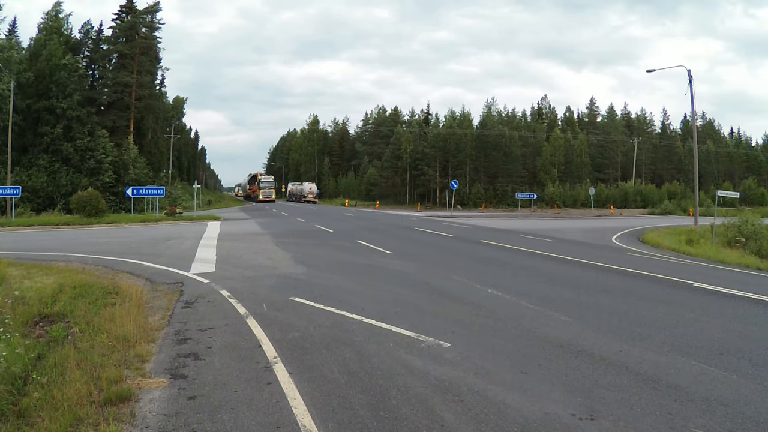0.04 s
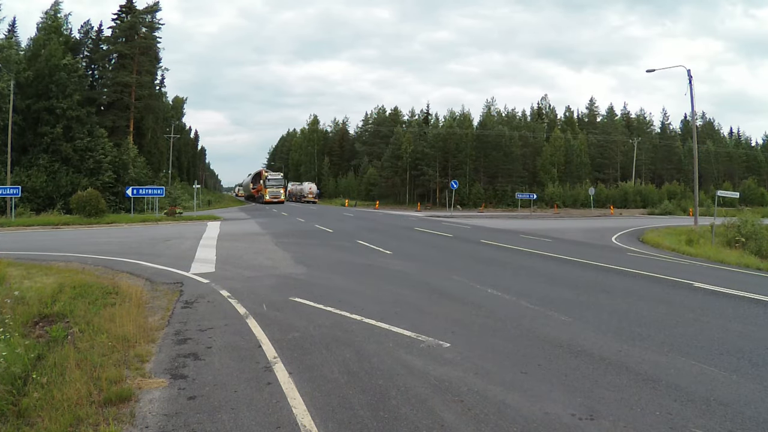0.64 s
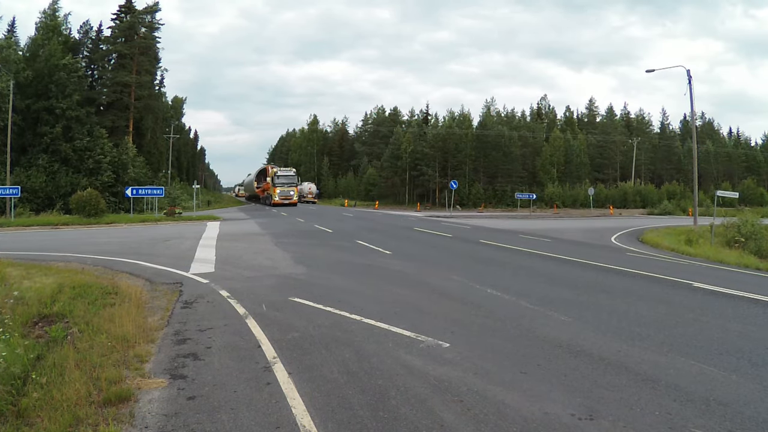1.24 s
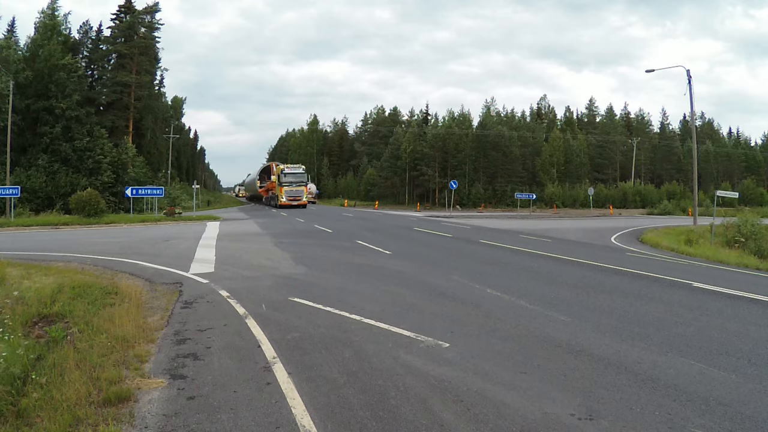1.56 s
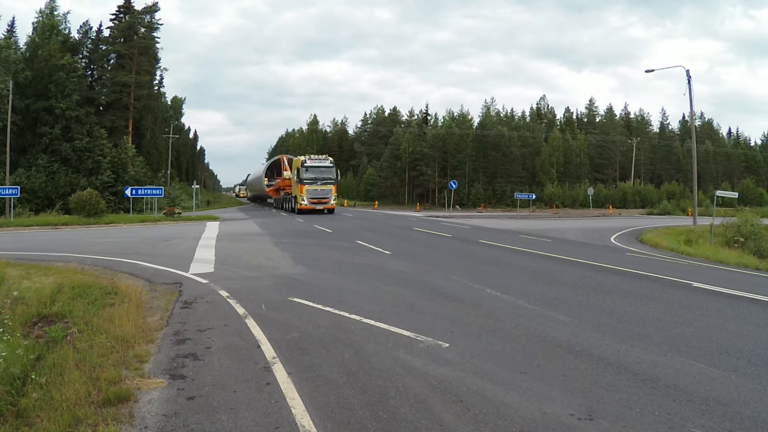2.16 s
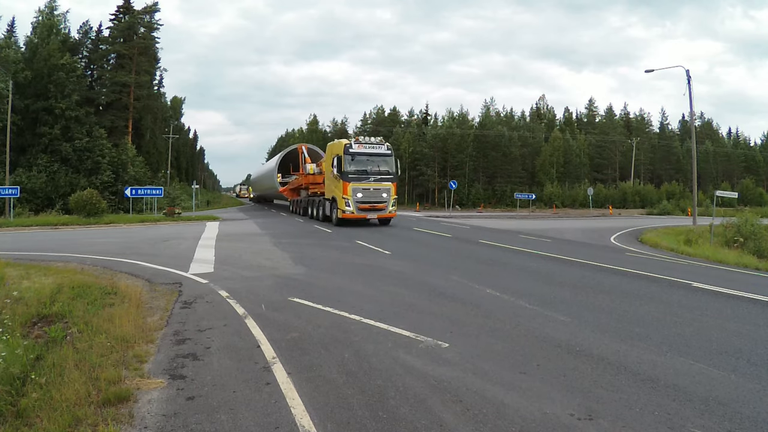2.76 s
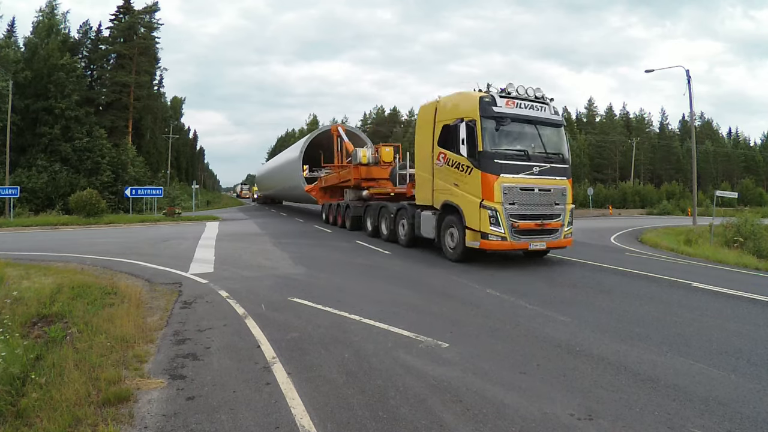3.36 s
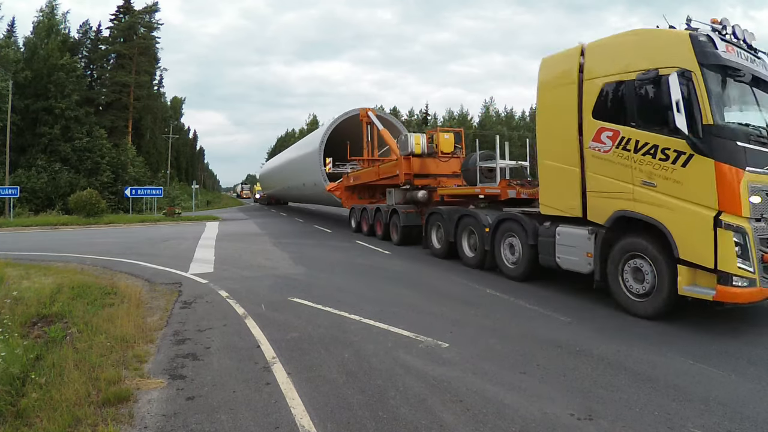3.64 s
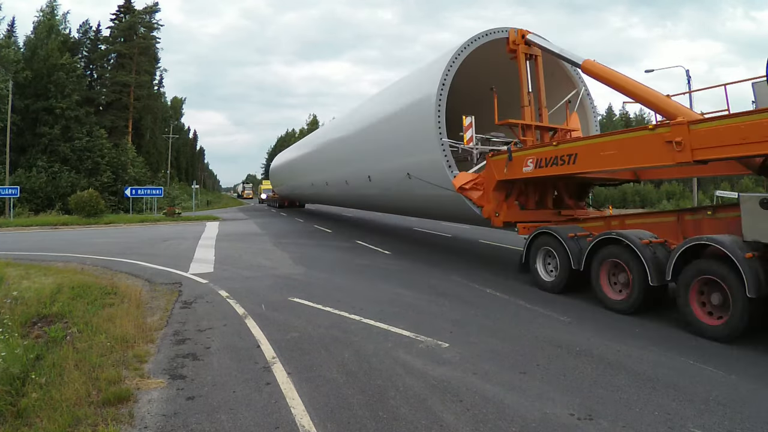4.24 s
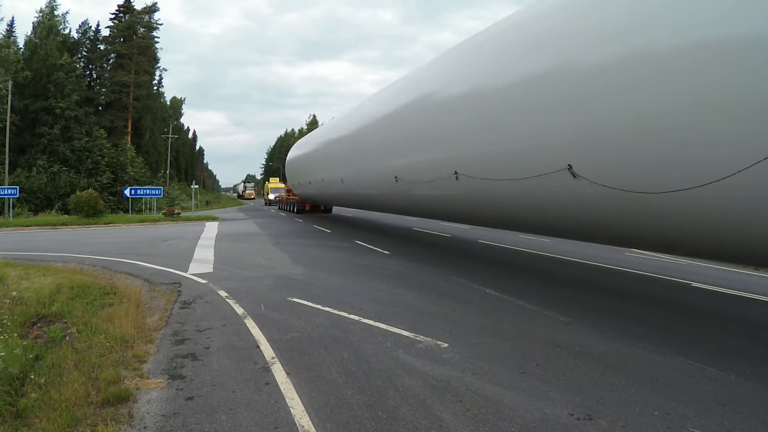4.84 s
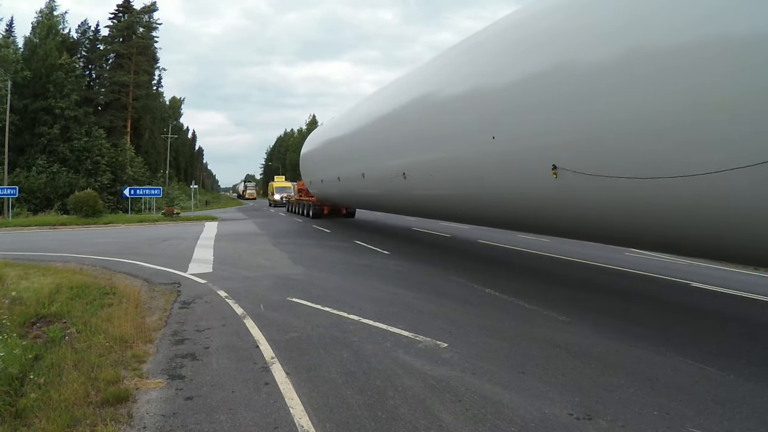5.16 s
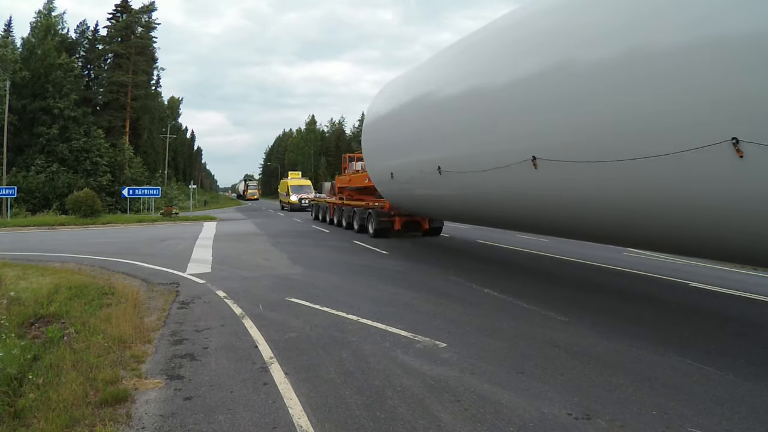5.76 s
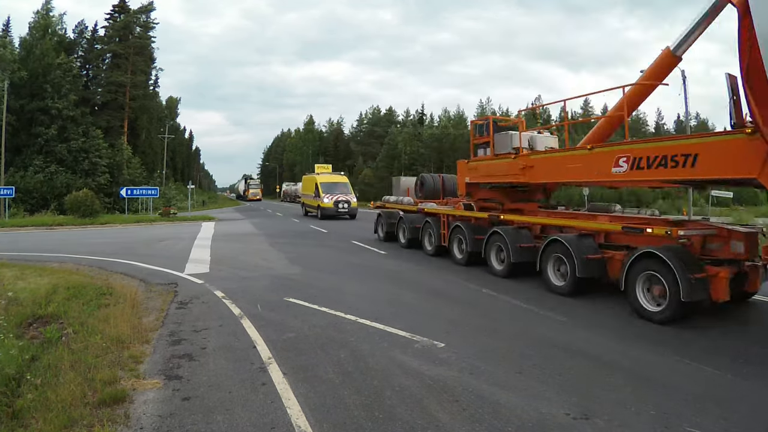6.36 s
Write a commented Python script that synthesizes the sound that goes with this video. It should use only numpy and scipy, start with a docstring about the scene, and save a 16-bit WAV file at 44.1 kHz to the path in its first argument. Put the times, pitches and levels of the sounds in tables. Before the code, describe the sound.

Two quick air horn blasts from an oncoming long truck, then its engine and tyres pass close by in gusty wind.

```python
"""From the verge of a country road, on a stereo microphone that the wind buffets throughout.
An escort car fades away while a long heavy truck comes down the road, tyres roaring, turbo hissing.
Nearly on us it gives a double toot on its air horn, and the tree line throws back a dull echo.
The cab passes close, its exhaust drone sinking in pitch; then the tread of the front bogie
howls by, and the rear bogie rolls up last."""
import sys
import numpy as np
from scipy import signal
from scipy.fft import rfft, irfft
from scipy.io import wavfile
from scipy.ndimage import uniform_filter1d

SR = 44100
rng = np.random.default_rng(int(sys.argv[2]) if len(sys.argv) > 2 else 0)


def pcm_store(signal):
    """Save signal as 16-bit PCM."""
    levels = np.round(np.clip(np.atleast_2d(signal), -1, 1) * 32767)
    wavfile.write(sys.argv[1], SR, levels.astype(np.int16).T)


N = 282240
TIME = np.arange(N) / SR
FRAME_S, BIN_HZ = np.arange(N // 256 + 5) * 256 / SR, np.fft.rfftfreq(1024, 1 / SR)
TOP_HZ = 15750
DOPPLER = 0.058  # the truck's speed over that of sound

# Escort car, tractor, front bogie, rear bogie. Each row: time when closest in seconds, relative roar
# in dB, half-width in seconds, hiss weighting in dB, share of NEAR_TYRES when closest, of REAR_TYRES.
WHEEL_PASSES = [(.05, -41, 2.2, -16, 0.67, 0.47), (4.05, -30, 0.84, -13.5, 0.55, 0.23),
                (4.72, -32.5, 0.29, -13, .97, 0.33), (6.7, -32.7, 0.85, -16, 0, 0.8)]
# Tread roar from afar, up close and at the rear. Each row: frequency in Hz, relative density in dB.
FAR_TYRES = [(150, -40), (280, -9.5), (480, -2), (780, 2.5), (1050, -6), (1400, -10), (2000, -12),
             (3000, -23), (6000, -35), (9500, -41), (15500, -59)]
NEAR_TYRES = [(150, -31), (280, -9.5), (450, -5.5), (690, -2.5), (1150, -11), (2050, -16), (3000, -23),
              (6500, -30.5), (9500, -41.5), (15500, -41)]
REAR_TYRES = [(150, -33), (280, -7), (560, -6), (880, 0), (1500, -6.5), (3000, -20.5), (6000, -32),
              (9300, -31.5), (12000, -42), (15500, -56)]
# Road noise at the microphone's two ports. Each row: frequency in Hz, left-right likeness from 0 to 1.
PORT_LIKENESS = [(100, 0.87), (400, 0.62), (3000, 0.78), (14000, 0.42)]
# The side the traffic is on. Each row: time in seconds, left minus right in dB.
BEARING = [(0.05, -8.5), (0.94, -3.5), (1.23, 2), (2.64, 2), (3.31, 0), (3.55, -3.5), (3.69, -2.5),
           (4.63, -9.5), (4.94, -8.5), (5.17, -7), (5.2, -7), (5.81, 1.0), (6.3, -1.0)]
# A source far to the right. Each row: frequency in Hz, phase lead of the left port in radians.
PORT_PHASE = [(60, -0.5), (200, -1.5), (700, -3), (1800, -5), (9000, -5)]
# Engine and chassis rumble, and turbocharger air. Each row: frequency in Hz, relative level in dB.
RUMBLE_COLOUR = [(30, -29), (100, -8), (138, -2.5), (175, -6.5), (220, -4.5), (300, -18), (900, -56)]
TURBO_COLOUR = [(3000, -72), (8500, -1), (10300, 3.5), (11100, -5), (15500, -10)]
# Wind on the microphone. Each row: start in seconds, length in seconds, strength in dB.
GUSTS = [(0.993, 0.083, -40), (1.76, 0.16, -40.5), (2.093, 0.57, -39.5), (3.85, 0.46, -37),
         (4.4, 0.72, -38), (5.16, 0.16, -32.5), (5.353, 1.02, -33.5)]
# Slow buffeting and faster eddies. Each row: frequency in Hz, relative density in dB.
WIND_COLOUR = [(5, 3), (14, 4), (40, 2.5), (75, -6.5), (180, -28.5), (450, -106)]
FLUTTER_COLOUR = [(30, -18), (65, 2), (115, -1.5), (200, -15), (450, -55)]
# Brief dips in the traffic's level. Each row: start in seconds, nominal depth in dB.
DIPS = [(1.01, 8), (1.762, 7), (2.12, 4.5), (2.8, 3)]
# Stones flicked by the tyres. Each row: start in seconds, relative level in dB, ring in Hz.
STONES = [(2.0208, -51, 6140), (3.1368, -35, 7560), (6.048, -42, 4860)]
# Pulls on the horn valve. Each row: time of full pressure, hold, rise and release in seconds,
# pressure in dB, second pipe mode relative to the first in dB.
TOOTS = [(3.26, 0.12, .013, 0.097, 0, -11), (3.533, 0.0034, 0.046, 0.053, -0.79, -1.5)]
# The horn's overtones at full blast. Each row: frequency in Hz, relative level in dB.
HORN_BELL = [(800, 2), (1080, 2.8), (1350, 1), (1900, 3), (2450, -1), (3000, -3.5), (4200, -10.5),
             (6200, -20.5), (8500, -15), (11000, -21.5), (15500, -29)]
# Wave steepening in the horn. Each row: frequency in Hz, dB an overtone gains for each dB of blare.
STEEPENING = [(800, 0.19), (1600, 0.92), (3200, 1), (4500, 2), (9000, 3)]
# Howling tread. Each row: time when closest in seconds, level in dB, half-width in seconds, pitch in Hz.
BOGIE_HOWLS = [(4.5, -32, 0.22, 680), (6.5, -34.5, 0.2, 850)]


def amp(db):
    return 10 ** (np.asarray(db) / 20)


def unit_rms(x):
    return x / np.sqrt(np.mean(x ** 2) + 1e-20)


def spectrum_at(points, hz):
    """A spectrum table interpolated over log frequency."""
    f, value = np.transpose(points)
    return np.interp(np.log(hz + 1), np.log(f + 1), value)


def drift(rate_hz, size):
    """Random wander of rms 1, mostly below rate_hz."""
    hz = np.fft.rfftfreq(size, 1 / SR)
    return unit_rms(irfft(rfft(rng.standard_normal(size)) / (1 + (hz / rate_hz) ** 4), size))


def stereo_noise(gain, patchy_db, likeness=None):
    """Patchy noise, partly alike at the two ports, shaped by gains over frames and bins."""
    if likeness is None:
        likeness = spectrum_at(PORT_LIKENESS, BIN_HZ)
    a, b, c, d, patches = rng.standard_normal((5, len(FRAME_S), len(BIN_HZ)))
    patches = unit_rms(uniform_filter1d(uniform_filter1d(patches, size=9, axis=0), size=14, axis=1))
    left = a + 1j * b
    right = likeness * left + np.sqrt(1 - likeness ** 2) * (c + 1j * d)
    spectra = np.array([left, right]) * gain * amp(patchy_db * patches)
    return signal.istft(spectra.swapaxes(1, 2), nperseg=1024, noverlap=768)[1][:, :N]


def band_norm(gain, low_hz, high_hz):
    return np.linalg.norm(gain[:, (BIN_HZ > low_hz) & (BIN_HZ < high_hz)], axis=1, keepdims=True)


def closeness(t, closest_s, width_s):
    """Inverse squared distance of a source driving straight past the microphone, 1 when closest."""
    return 1 / (1 + ((t - closest_s) / width_s) ** 2)


def passing(t, closest_s, db, width_s):
    """Gain of a source driving by: 23 dB less for each tenfold of squared distance."""
    return amp(db + 23 * np.log10(closeness(t, closest_s, width_s)))


def tyres(trim_db=1.3, hiss_trim_db=1.15, hiss_lead_s=0.46):
    """Each group of wheels roars by in turn; the tread throws its hiss forward, duller from afar."""
    t, power = FRAME_S[:, None], 0
    treble = spectrum_at([(1200, 0.062), (3500, 0.9)], BIN_HZ)
    far_db, near_db, rear_db = (spectrum_at(c, BIN_HZ) for c in (FAR_TYRES, NEAR_TYRES, REAR_TYRES))
    for closest_s, roar_db, width_s, hiss_db, near, rear in WHEEL_PASSES:
        near = near * closeness(t, closest_s, width_s)
        gain = amp((1 - near - rear) * far_db + near * near_db + rear * rear_db)
        gain /= band_norm(gain, 450, 2200)
        plain_hiss_db = 20 * np.log10(band_norm(gain, 3000, 7000))
        dull_db = 7 * (1 - closeness(t + hiss_lead_s, closest_s, width_s))
        gain *= amp(treble * (hiss_db + hiss_trim_db - dull_db - plain_hiss_db))
        gain *= passing(t, closest_s, roar_db + trim_db, width_s)
        power = power + gain ** 2
    return stereo_noise(np.sqrt(power), patchy_db=1.33)


def approach(t, abreast_s=4.18, glide_s=0.301):
    """The cab's motion towards the microphone: 1 head-on, -1 going away."""
    return (abreast_s - t) / np.hypot(abreast_s - t, glide_s)


def engine(rest_hz=214.6, waver_db=0.5, fuzz=0.34):
    """A wavering exhaust drone that sinks with the Doppler shift, over engine and chassis rumble."""
    toward = approach(TIME)
    hz = rest_hz * (1 + DOPPLER * toward) + drift(4.0, N)
    phase = 2 * np.pi * np.cumsum(hz) / SR
    distant = amp(np.interp(toward, [-1, 1], [-55, -45.5]))  # louder coming than going
    level = np.hypot(distant, passing(TIME, closest_s=4.29, db=-31.5, width_s=0.3))
    drone = 0
    for k, harmonic_db in enumerate([1, -16, -16], 1):
        waver = amp(waver_db * drift(5, N)) + fuzz * (drift(25, N) + 1j * drift(24, N))
        drone = drone + level * amp(harmonic_db) * (waver * np.exp(1j * k * phase)).real
    rumble = np.hypot(amp(-44.5), passing(FRAME_S[:, None], closest_s=3.95, db=-35, width_s=0.73))
    colour = amp(spectrum_at(RUMBLE_COLOUR, BIN_HZ))
    return drone + stereo_noise(rumble * colour / np.linalg.norm(colour), patchy_db=-0.2)


def gusts(breeze_db=-44, rise_s=0.023, fall_s=0.058):
    """Strength of the wind: a steady breeze, and gusts that rise fast, hold and die away."""
    power = amp(breeze_db) ** 2
    for start_s, length_s, db in GUSTS:
        age = TIME - start_s
        shape = np.clip(age / rise_s, 0, 1) * np.exp(-np.maximum(age - length_s, 0) / fall_s)
        power = power + (amp(db) * shape) ** 2
    return np.sqrt(power)


def buffet(colour, lumps_db):
    """Lumpy low noise of rms 1, separate at each microphone port."""
    shape = amp(spectrum_at(colour, np.fft.rfftfreq(N, 1 / SR)))
    ports = []
    for _ in range(2):
        eddies = irfft(rfft(rng.standard_normal(N)) * shape, N)
        ports.append(unit_rms(eddies * amp(lumps_db * drift(4.0, N))))
    return np.array(ports)


def wind(buffet_db=1.0, flutter_db=-41.5, hard_gust_db=-33, left_db=3.5):
    """Wind on the microphone, harder on the left; its flutter grows with the square of its strength."""
    strength = gusts()
    slow = strength * amp(buffet_db) * buffet(WIND_COLOUR, lumps_db=0.5)
    flutter = (strength / amp(hard_gust_db)) ** 2 * amp(flutter_db) * buffet(FLUTTER_COLOUR, lumps_db=1.5)
    return (slow + flutter) * amp([[left_db], [0]])


def turbo(start_s=0.67, rise_s=2.5, closest_s=3.79, shade_db_per_s=3):
    """Turbocharger air hisses in from up the road and sinks in pitch; the cab hides it once past."""
    t = FRAME_S[:, None]
    distant = amp(-69.5) * np.clip((t - start_s) / rise_s, 0, 1)
    close = amp(-44.5) * closeness(t, closest_s, width_s=0.3) ** 0.73
    level = np.hypot(distant, close) * amp(-shade_db_per_s * np.maximum(t - closest_s, 0))
    shift = (1 + DOPPLER * approach(t)) / (1 + DOPPLER)
    colour = amp(spectrum_at(TURBO_COLOUR, BIN_HZ / shift))
    colour /= np.linalg.norm(colour, axis=1, keepdims=True)
    return stereo_noise(level * colour, patchy_db=1.5, likeness=0.84)


def dips(drop_s=0.04, recovery_db_per_s=15.5):
    """A gain that drops quickly at each dip and climbs back steadily."""
    loss_db = 0
    for start_s, depth_db in DIPS:
        age = TIME - start_s
        loss_db += np.clip(age / drop_s, 0, 1) * np.maximum(depth_db - recovery_db_per_s * age, 0)
    return amp(-loss_db)


def grit(trim_db=-4, ring_s=0.0018):
    """Small stones snap out from under the tread."""
    ticks, t = np.zeros(N), TIME[:SR // 50]
    for start_s, db, hz in STONES:
        tick = drift(1500, len(t)) * np.sin(2 * np.pi * hz * t) * np.exp(-t / ring_s)
        ticks += amp(db + trim_db) * np.interp(TIME, start_s + t, tick, left=0, right=0)
    return ticks


def horn_reed(t, gentle_hz=273.3, flat_hz=1.8, sag_hz=6.4, wobble_hz=0.51, break_s=3.329):
    """Air pressure on the reed sets pitch, pipe modes and blare; it rattles as the overblowing breaks."""
    pulls_db = []
    for full_s, hold_s, rise_s, release_s, db, _ in TOOTS:
        off_peak = np.maximum(full_s - t, 0) / rise_s + np.maximum(t - full_s - hold_s, 0) / release_s
        pulls_db.append(db - 5.5 * off_peak ** 1.88)
    pressure_db = np.max(pulls_db, axis=0)
    octaves_db = np.array(TOOTS)[:, -1:] * np.ones(len(t))
    octave_db = np.average(octaves_db, axis=0, weights=amp(pulls_db) ** 2 + 1e-20)
    # Overblown, the note settles flatter, and the second mode takes over and swells with the overtones.
    overblown = 0.5 - 0.5 * np.tanh((t - break_s) / 0.0053)
    settled = overblown * (1 - np.exp(-np.maximum(t - TOOTS[0][0], 0) / 0.022))
    swell_db = 1.5 * np.exp(-((t - 3.302) / 0.021) ** 2)
    rattle = np.exp(-((t - break_s - 0.012) / 0.02) ** 2)
    blare_db = 9 * pressure_db
    hz = gentle_hz - flat_hz * amp(blare_db) - sag_hz * settled + wobble_hz * drift(33, len(t))
    pipe_db = -14 + pressure_db - 6 * rattle
    first_db = pipe_db - 15.5 * overblown
    second_db = pipe_db + octave_db * (1 - overblown) - 2 * overblown + swell_db
    roughness = 0.1 * (1 - overblown) + 0.67 * rattle
    return hz, first_db, second_db, blare_db + swell_db, roughness


def horn(open_s=3.215, silent_s=3.72, overtones_db=-20.5, odd_db=-5, flutter_db=2.5, air_db=-30):
    """The air horn starts overblown on its second mode, rasps down to the first, and swells once more."""
    t = np.arange(open_s, silent_s, 1 / SR)
    n = len(t)
    hz, first_db, second_db, blare_db, roughness = horn_reed(t)
    phase = 2 * np.pi * np.cumsum(hz) / SR
    overblown = np.clip((second_db - first_db) / 20, 0, 1)
    # One sharp pulse a cycle when blown gently; it splits into several when blown hard.
    smear = 1.25 * (0.25 + uniform_filter1d(amp(blare_db) + overblown, size=2000))
    tone = np.zeros((2, n))
    for k in range(1, int(TOP_HZ / hz.max())):
        f = k * hz.mean()
        if k <= 2:
            db = first_db if k == 1 else second_db
        else:  # the wave steepens with pressure, so high overtones come last and go first
            db = overtones_db + spectrum_at(HORN_BELL, f) + blare_db * spectrum_at(STEEPENING, f)
            db += odd_db * overblown * (k % 2) + flutter_db * drift(33, n)
        rasp = roughness * (1 - 1 / k) * (drift(53, n) + 1j * drift(70, n))
        # Short waves reach the two ports out of step.
        port_phase = np.array([[0.5], [-0.5]]) * (f / 9500) ** 1.2 * (1 + drift(5.5, n))
        angle = k * phase + smear * rng.uniform(-0.93, 1) + port_phase
        tone -= amp(db) * ((1 + rasp) * np.exp(1j * angle)).real
    air = signal.lfilter([1], [1, -0.6], rng.standard_normal(tone.shape)) * (1 + np.cos(phase))
    tone += amp(air_db + 2 * blare_db) * unit_rms(air)
    tone *= signal.windows.tukey(n, 0.05)
    valve_knock = amp(-32) * drift(1160, n) * np.exp(-(t - open_s) / 0.0093)
    return np.array([np.interp(TIME, t, valve_knock + port, left=0, right=0) for port in tone])


def tree_echo(x, t60_s=0.48, dull_hz=1200):
    """The tree line scatters back a dull tail, different on each side of the microphone."""
    tail = rng.standard_normal((2, SR)) * amp(-60 * TIME[:SR] / t60_s)
    tail = signal.sosfilt(signal.butter(2, dull_hz, fs=SR, output="sos"), tail)
    return signal.fftconvolve(x, tail / np.linalg.norm(tail[0]), axes=1)[:, :N]


def tread_howl(half_band_hz=64):
    """A narrow band sings out of the tread roar as each bogie rolls by."""
    gain = 0
    for closest_s, db, width_s, hz in BOGIE_HOWLS:
        band = 1 / (1 + ((BIN_HZ - hz) / half_band_hz) ** 4)
        gain = gain + passing(FRAME_S[:, None], closest_s, db, width_s) * band / np.linalg.norm(band)
    return stereo_noise(gain, patchy_db=4.5)


def pan(x, far_right_db=9):
    """Traffic off to the right is weaker in the left port and shifted in phase there."""
    hz, t, (left, right) = signal.stft(x, SR, nperseg=1024, noverlap=768)
    pan_db = np.interp(t, *np.transpose(BEARING))
    aside = np.clip(-pan_db / far_right_db, 0, 1) ** 3
    turn = np.angle(1 - aside + aside * np.exp(1j * spectrum_at(PORT_PHASE, hz))[:, None])
    ratio = amp(pan_db)
    spectra = np.array([left * ratio * np.exp(1j * turn), right]) * np.sqrt(2 / (1 + ratio ** 2))
    return signal.istft(spectra, nperseg=1024, noverlap=768)[1][:, :N]


def scene():
    """What reaches the verge: the traffic, the horn and its echo, and the wind."""
    toots = horn()
    traffic = dips() * (tyres() + tread_howl() + engine() + turbo())
    return pan(toots + traffic + grit()) + amp(-20.5) * tree_echo(toots) + wind()


def record(dry, threshold_db=-4.0, recovery_db_per_s=16):
    """The recorder's limiter ducks the horn, lets the road back slowly and rounds off stray spikes."""
    recovery_db = TIME * recovery_db_per_s
    peak_db = 20 * np.log10(abs(dry).max(0) + 1e-9)
    held_db = np.maximum.accumulate(peak_db + recovery_db) - recovery_db
    over_db = np.maximum(held_db - threshold_db, 0)
    limited = dry / amp(uniform_filter1d(0.63 * over_db, size=60))
    rounded = limited / (1 + (limited / 0.66) ** 4) ** (1 / 4)
    lowpass = signal.firwin(511, TOP_HZ, window=("kaiser", 9), fs=SR)
    return signal.oaconvolve(rounded, lowpass[None], "same")


dry = scene()
out = record(dry)
pcm_store(out)
```